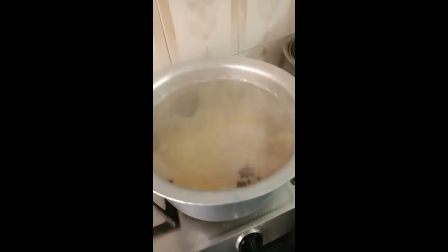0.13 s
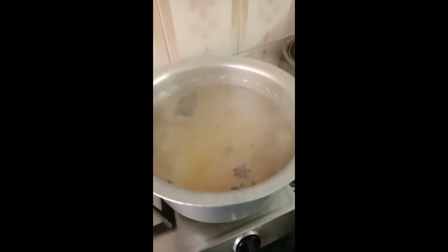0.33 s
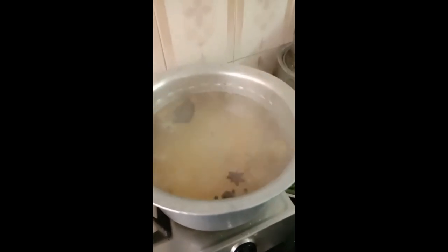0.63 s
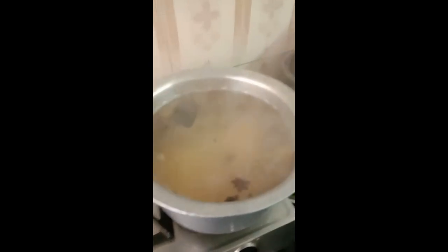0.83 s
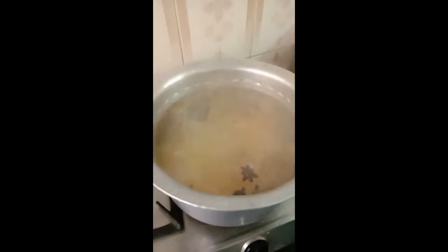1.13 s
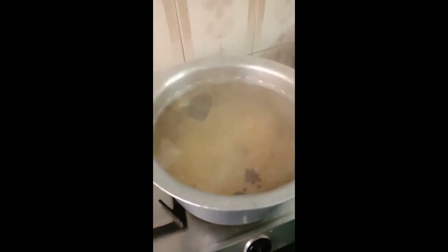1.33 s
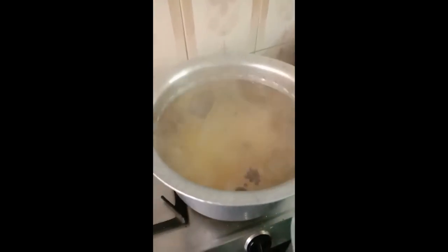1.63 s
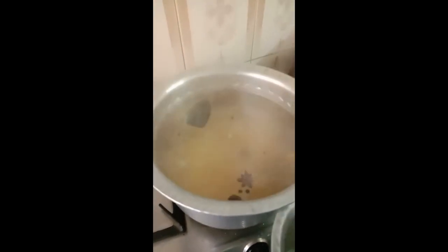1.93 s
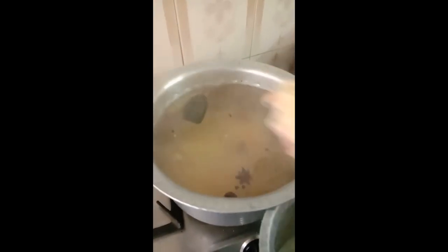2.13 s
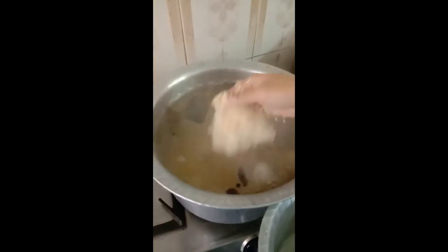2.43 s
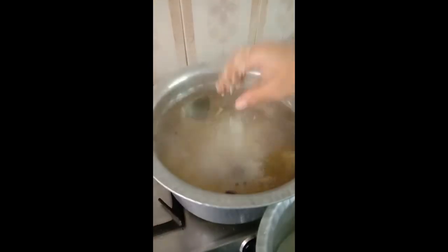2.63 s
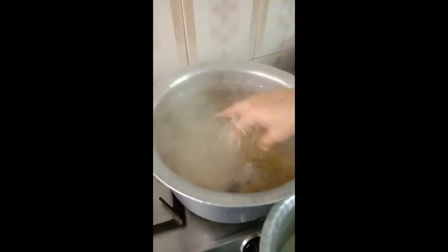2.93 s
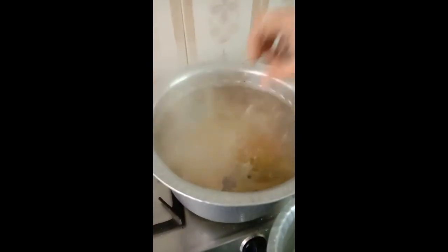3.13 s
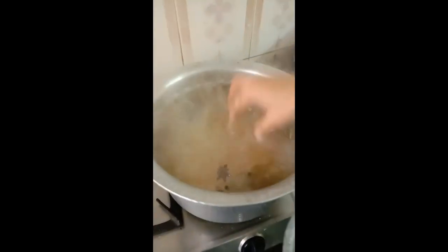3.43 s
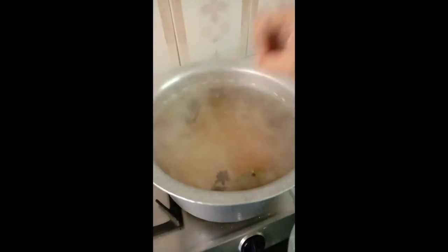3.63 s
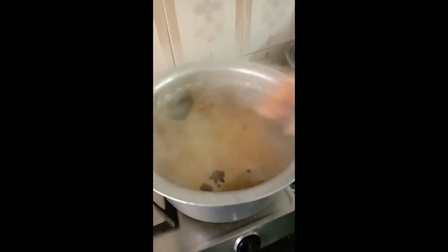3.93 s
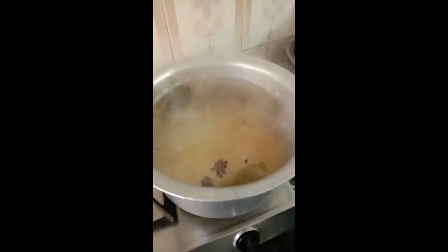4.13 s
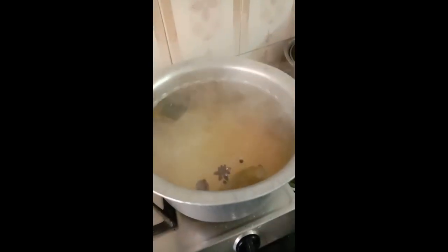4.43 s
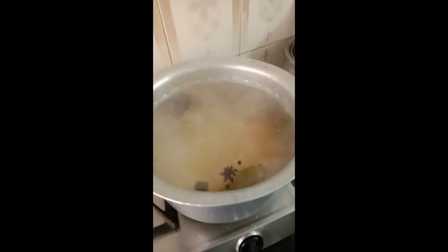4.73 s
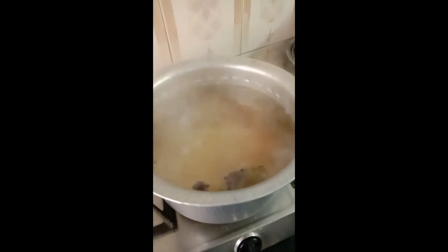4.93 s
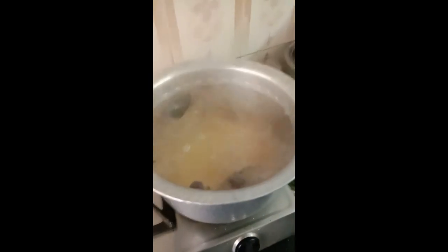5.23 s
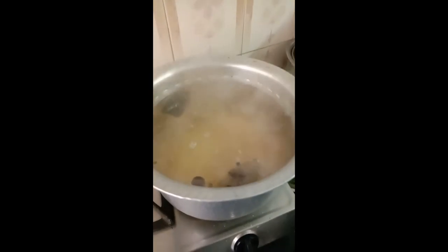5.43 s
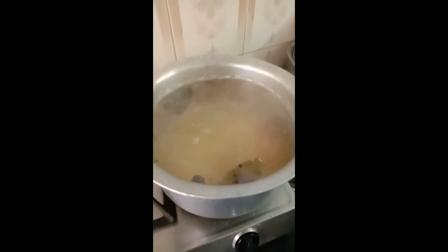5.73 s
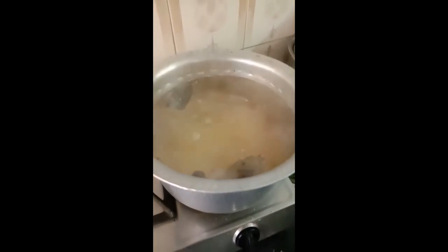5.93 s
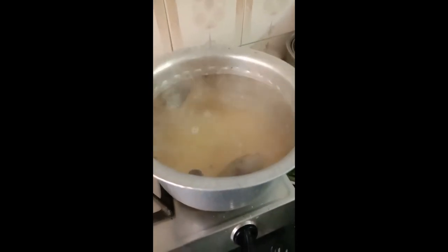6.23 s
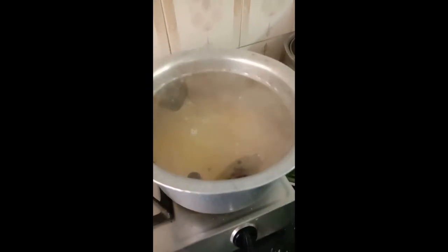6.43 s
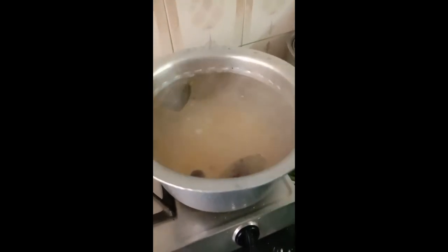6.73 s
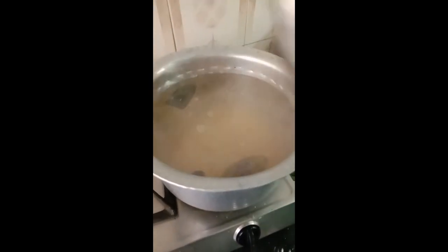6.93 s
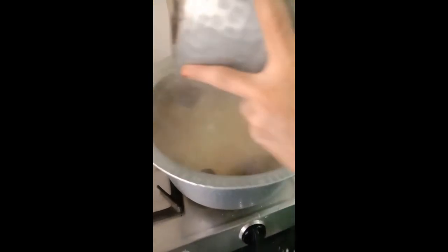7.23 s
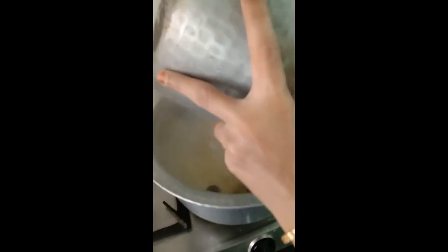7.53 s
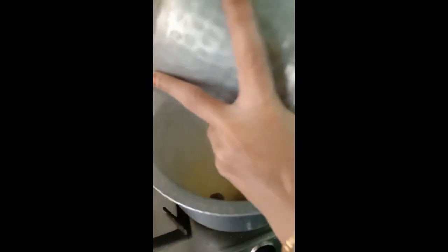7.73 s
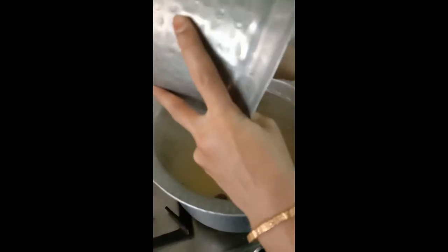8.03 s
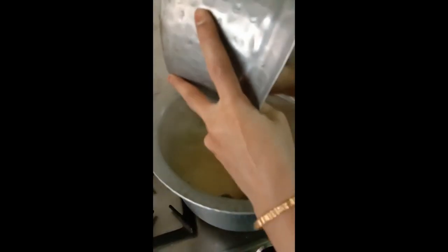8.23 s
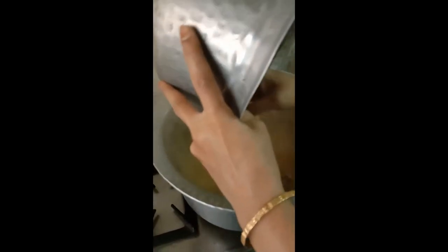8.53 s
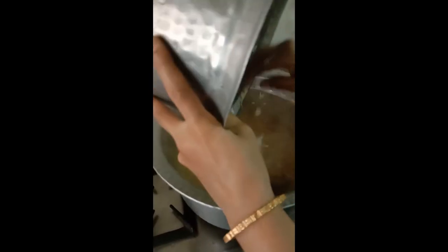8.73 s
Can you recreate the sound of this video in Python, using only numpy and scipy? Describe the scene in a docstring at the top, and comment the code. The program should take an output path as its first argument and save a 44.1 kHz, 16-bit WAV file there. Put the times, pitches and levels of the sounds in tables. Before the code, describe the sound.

A gas burner hisses steadily under a simmering pot while a cricket chirps outside. Wet rice drips and smacks into the water with bubbly plops, then metal knocks against the pot and rings. A metal vessel is set down with a few clanks and low booms, water wobbling inside it. Near the end more water and rice slop into the pot. It is heard close up in a small tiled kitchen with a short echo.

```python
"""First you hear a gas burner hissing under a simmering pot, with a cricket chirping outside.
Wet rice drips and smacks into the pot, trapping air bubbles that ring; metal knocks on metal.
The metal rice vessel is set down with a low boom, and the water swaying in it bends its notes.
Then more water and rice slop into the pot. The tiled walls of the small kitchen add a short echo."""
import sys
import numpy as np
from scipy import signal
from scipy.fft import rfft, irfft, next_fast_len
from scipy.io import wavfile
from scipy.ndimage import uniform_filter1d, map_coordinates

SR = 44100
rng = np.random.default_rng(int(sys.argv[2]) if len(sys.argv) > 2 else 0)


def output_pcm(signal):
    """Save a mono or channel-first signal as 16-bit PCM at the path in sys.argv[1].

    Samples are clipped to [-1, 1] before scaling.
    """
    pcm = np.clip(np.atleast_2d(signal).T, -1, 1) * 32767
    wavfile.write(sys.argv[1], SR, np.round(pcm).astype(np.int16))


N = 391166
TIME = np.arange(N) / SR
FFT_SIZE = next_fast_len(N, True)


def amp(db):
    """Turns decibels into a number to multiply by."""
    return 10 ** (np.asarray(db) / 20)


def unit(x):
    """Scales a signal to an average size (rms) of 1."""
    return x / np.sqrt(np.mean(x ** 2) + 1e-20)


def at_pitch(points, hz):
    """Looks up a value by frequency, on a scale of octaves."""
    f, value = np.transpose(points)
    return np.interp(np.log(hz + 1), np.log(f + 1), value)


def at_time(points, t=TIME):
    """Looks up a value by time."""
    return np.interp(t, *np.transpose(points))


def add(mix, s, sound):
    """Mixes a sound in at s seconds."""
    part = mix[max(round(s * SR), 0):][:len(sound)]
    part += sound[:len(part)]


def noise(colour, size):
    """Noise whose colour(hz) says how strong each frequency is, in dB."""
    hz = np.fft.rfftfreq(size, 1 / SR) + 1
    phases = np.exp(2j * np.pi * rng.random(len(hz)))
    return unit(irfft(amp(colour(hz)) * phases, size))


def hump(centre_hz, octaves):
    """A colour with one peak, 6 dB weaker this many octaves to either side."""
    return lambda hz: -6 * (np.log2(hz / centre_hz) / octaves) ** 2


def boost(resonances, hz):
    """How many dB a set of peaks and dips adds at each frequency."""
    return sum(db * np.exp(-2 * ((hz - f) / width) ** 2) for f, width, db in resonances)


def wander(per_s):
    """A random wobble that heads for a new value per_s times a second."""
    targets = rng.standard_normal(2000)
    return unit(np.interp(TIME * per_s, np.arange(len(targets)), targets))


def drifting(colour, drift, per_s):
    """Noise whose peaks all slide up and down in pitch together."""
    steady = noise(colour, next_fast_len(N + SR, True))
    position = np.cumsum(1 + drift * wander(per_s))
    return map_coordinates(steady, [position], order=3, mode="wrap")


def flicker(x, depth_db):
    """Makes narrow bands of a hiss briefly swell and sink."""
    bands = signal.stft(x, nperseg=1024, noverlap=768)[2]
    patches = uniform_filter1d(rng.standard_normal(bands.shape), size=4, axis=0)
    patches = unit(uniform_filter1d(patches, size=13, axis=1))
    return signal.istft(bands * amp(depth_db * patches), nperseg=1024, noverlap=768)[1][:N]


# Colours of the burner's roar and of its hiss: f/Hz, level/dB
ROAR_COLOUR = [(20, 2.5), (48, -12), (65, -28), (88, 0.5), (120, -16), (160, -6), (230, -14), (400, -16),
               (600, -22), (780, -13.5), (900, -20.5), (1020, -13.5), (1270, -4), (1550, -13.5),
               (2100, -23.5), (2600, -37), (3300, -61), (6000, -80)]
HISS_COLOUR = [(2700, -94), (3100, -12.5), (3500, -13.5), (4250, -10), (4850, -11), (5300, -9), (6300, -4),
               (7200, -7), (8000, -6.5), (9700, -6.5), (11500, -13), (13500, -18), (15000, -7),
               (16000, -6.5)]
# Peaks and dips from the burner, the pot and their corner: f/Hz, width/Hz, boost/dB
BURNER_RESONANCES = [(900, 12, 6), (1267, 64, 8), (1404, 18, 9), (1860, 120, 4), (2330, 210, -5),
                     (2710, 120, -5), (3020, 230, -9), (3990, 470, 3.5), (4234, 142, -20), (4796, 190, 7),
                     (5245, 146, -24), (7160, 690, 11), (7960, 230, -8.5), (8700, 130, 3),
                     (8790, 275, -13.5)]
# Loudness of the flowing gas and of the fluttering flame: t/s, level/dB
GAS_LEVEL = [(0.0, -41.5), (1.3, -44), (2.5, -42), (5.4, -43), (6.9, -45), (7.5, -43), (8.5, -45),
             (8.87, -43)]
FLAME_LEVEL = [(0.0, -45), (0.48, -55.5), (0.54, -42), (0.87, -52), (0.89, -41), (1.07, -48), (1.23, -42),
               (1.76, -56), (1.86, -42.5), (2.16, -42.5), (2.63, -60), (3.0, -55), (3.02, -43.5),
               (3.25, -58.5), (3.74, -42), (3.85, -55.5), (4.2, -45.5), (4.45, -60.5), (4.7, -69),
               (7.5, -66), (8.87, -59)]
def burner():
    """Gas hisses through the jet and roars in the tube; the flame flutters low under the pot."""
    def hiss_colour(hz):
        bass_cut_db = 40 * np.maximum(np.log2(2500 / hz), 0)
        return at_pitch(HISS_COLOUR, hz) + boost(BURNER_RESONANCES, hz) - bass_cut_db

    roar = noise(lambda hz: at_pitch(ROAR_COLOUR, hz) + boost(BURNER_RESONANCES, hz), FFT_SIZE)[:N]
    roar *= amp(-52 + 2.5 * wander(per_s=14))
    hiss = drifting(hiss_colour, drift=0.014, per_s=3.5)
    hiss *= amp(at_time(GAS_LEVEL) + 1.21 + wander(per_s=24))
    flame = noise(hump(centre_hz=95, octaves=0.35), FFT_SIZE)[:N]
    flame *= amp(at_time(FLAME_LEVEL) + 2.5 * wander(per_s=14))
    return flicker(roar, depth_db=2) + flicker(near_echoes(hiss), depth_db=1.47) + flame


# Hollow notes of the pot: f/Hz, half-width/octaves, level/dB
HOLLOW_NOTES = [(895, 0.066, -67), (1120, 0.063, -67.5), (1266, 0.045, -59.5)]
# They grow as the water comes back to the boil: t/s, boost/dB
SIMMER_GROWTH = [(0, -11.5), (4.5, 2.5), (6, 5), (8.87, 8)]
def simmer(surge_db=4.5):
    """Steam wells up unevenly and sounds the pot's hollow notes, which drift as it swirls."""
    out = np.zeros(N)
    for hz, octaves, db in HOLLOW_NOTES:
        note = drifting(hump(hz, octaves), drift=0.011, per_s=6)
        out += note * amp(db + at_time(SIMMER_GROWTH) + surge_db * wander(per_s=13))
    return out


def crackle(ticks_per_s=30, decay_s=0.00082):
    """Tiny bubbles burst on the surface with faint ticks."""
    out, t = np.zeros(N), np.arange(512) / SR
    for when, size in rng.random((1500, 2))[:int(ticks_per_s * N / SR)]:
        db = -45 - 3 * np.log(1 - 0.97 * size)
        tick = noise(hump(centre_hz=7500, octaves=0.78), len(t)) * np.exp(-t / decay_s)
        add(out, when * N / SR, amp(db) * tick)
    return out


def bubble(hz, cycles, rise):
    """Trapped air rings briefly and climbs in pitch as it nears the surface."""
    age = np.arange(int(4 * cycles * SR / hz) + 2) * hz / (cycles * SR)  # 1 after `cycles` swings
    loudness = np.exp(-age) * (1 - np.exp(-age * cycles * 2))
    return loudness * np.sin(2 * np.pi * cycles * (age + rise * age ** 2 / 2))


# Gushes of water and loose rice: start/s, peak/s, end/s, bubble level/dB, spray level/dB,
# big-bubble f/Hz, fade towards small bubbles/(dB per octave), spray f/Hz
GUSHES_OF_WATER = [(0.019, 0.1, 0.4, -39, -45.5, 1370, 6, 4530),
                   (0.29, 0.49, 0.91, -40.5, -69, 1010, 4.5, 5000),
                   (1.849, 1.895, 1.935, -46, -52, 1500, 11, 4500),
                   (2.455, 2.456, 2.68, -45.5, -43, 1530, 8, 5000),
                   (2.498, 2.625, 2.65, -45, -46, 1450, 6, 4250),
                   (4.24, 4.238, 4.34, -49, -46, 1550, -2, 3200),
                   (5.361, 5.42, 5.594, -49, -40.5, 1750, 1, 4530),
                   (5.44, 5.51, 5.58, -42, -48, 980, 8, 3000),
                   (5.81, 5.88, 5.95, -44.5, -51, 1920, 7, 3900),
                   (5.89, 5.935, 6.11, -44, -51, 1140, 7.5, 3570),
                   (6.403, 6.418, 6.51, -35, -59, 1830, 16.5, 3000),
                   (6.53, 6.58, 6.68, -48, -72, 790, 9, 3020),
                   (7.203, 7.312, 8, -40.5, -62, 1640, 19, 3000),
                   (7.348, 7.413, 7.62, -39, -45, 1100, 4.5, 2600),
                   (7.621, 7.77, 8.2, -62, -48, 850, 4, 4100),
                   (8.155, 8.173, 8.24, -48, -53, 2600, 8, 3480),
                   (8.2, 8.404, 8.62, -49, -67, 870, 3, 3800),
                   (8.595, 8.665, 8.78, -44.5, -49, 1420, 2.5, 3020)]
def bubbling(pitches=48, bubbles_per_s=9000, spread_db=4.8):
    """Boiling and falling water make a swarm of bubbles; the smaller ones are fainter."""
    out = np.zeros(N)
    strength, lowest_hz, fade_db = water_flow()
    per_pitch = int(bubbles_per_s * N / SR / pitches)
    for hz in np.geomspace(550, 12000, pitches):
        when, size, sign = rng.random((2500, 3))[:per_pitch].T
        starts = (when * (N - 1)).astype(int)
        octaves_up = np.log2(hz / lowest_hz[starts])
        db = spread_db * np.minimum(-np.log(1 - size), 4) - fade_db[starts] * np.maximum(octaves_up, 0)
        db += 60 * np.minimum(octaves_up, 0)  # bubbles too big for the stream barely sound
        ring = np.sqrt(hz) * bubble(hz, cycles=9.8, rise=0.021)
        rings = np.outer(amp(db) * np.sign(sign - 0.5), ring)
        samples = starts[:, None] + np.arange(len(ring))
        out += np.bincount(samples.ravel(), rings.ravel(), N)[:N]  # adds each ring in its place
    return unit(out) * amp(-4) * strength


def water_flow(boil_hz=1040, boil_fade_db=4.5, sink_octaves=0.14):
    """Blends an uneven boil with the gushes into the bubbles' strength, lowest note and treble fade."""
    power = amp(-58.5 + 3 * wander(per_s=4.5)) ** 2
    note, fade = power * boil_hz, power * boil_fade_db
    for start, peak, end, db, _, hz, fade_db, _ in GUSHES_OF_WATER:
        gush = (amp(db) * np.interp(TIME, [start, peak, end], [0, 1, 0])) ** 2
        progress = np.interp(TIME, [start, end], [-0.5, 0.5])
        power += gush
        note += gush * hz * 2 ** (-sink_octaves * progress)  # bubbles grow as the gush digs in
        fade += gush * fade_db
    return np.sqrt(power), note / power, fade / power


def spray(patter_db=2):
    """With each gush, countless tiny splashes merge into a soft swish."""
    out, patter = np.zeros(N), amp(patter_db * wander(per_s=300))
    for start, peak, end, _, db, _, _, hz in GUSHES_OF_WATER:
        swell = np.interp(start + np.arange(SR) / SR, [start, peak, end], [0, 1, 0])
        add(out, start, amp(db) * swell * noise(hump(hz, octaves=0.86), SR))
    return out * patter


# When each chirp starts: t/s
CHIRP_STARTS = [0.019, .62, 1.251, 1.868, 2.5, 3.178, 3.848, 4.198, 4.738, 5.366, 5.98, 6.697, 7.339, 7.965,
                8.662]
# The cricket grows louder halfway through: t/s, level/dB
CHIRP_LEVEL = [(0, -57), (3.9, -54), (4.7, -50), (6.8, -46.5), (8.87, -48)]
def cricket(wing_hz=4500, sag_hz=60, strokes_per_s=32, stroke_s=0.021, chirp_s=0.255, rise_s=0.011):
    """Each wing stroke is a short tone that sags in pitch; eight make a chirp."""
    out, progress = np.zeros(N), np.linspace(0, 1, int(stroke_s * SR))
    strokes = np.arange(0, chirp_s - stroke_s / 2, 1 / strokes_per_s)
    for start in CHIRP_STARTS:
        db = at_time(CHIRP_LEVEL, start)
        for s, (late, size, detune) in zip(strokes, rng.standard_normal((20, 3))):
            hz = wing_hz + 12 * detune + sag_hz * (0.5 - progress)
            stroke = np.sin(np.pi * progress) * np.sin(2 * np.pi * np.cumsum(hz) / SR)
            onset = 1 - np.exp(-(s + stroke_s) / rise_s)
            gain = 2 * onset * amp(db + 2 * size - s)  # fades 1 dB a second
            add(out, start + s + 0.0008 * late, gain * stroke)
    return out


# The loudest plops: t/s, level/dB, f/Hz, ring time/cycles
DROP_PLOPS = [(.082, -47, 1590, 36), (0.209, -32, 2940, 8), (0.288, -33, 1990, 15),
              (.364, -31.5, 1380, 5.1), (0.421, -45.5, 863, 15), (0.458, -33, 1287, 9.7),
              (0.508, -38, 1230, 13), (.586, -38, 1195, 14), (.679, -37.5, 786, 10),
              (0.682, -39.5, 1280, 7.8), (0.707, -39, 1230, 15), (.71, -46, 866, 11),
              (0.759, -45, 2950, 19), (.811, -37.5, 2930, 4.3), (0.95, -40, 3310, 8.8),
              (1.04, -43.5, 3200, 9), (1.081, -41, 792, 14), (1.082, -40.5, 1120, 29),
              (1.124, -39.5, 1272, 25), (1.137, -52, 755, 22), (1.196, -32, 2480, 4.7),
              (1.251, -37, 1151, 10), (1.328, -41.5, 3100, 3.8), (1.433, -26, 4510, 3.1),
              (2.642, -38, 1960, 5), (3.01, -49, 2330, 4), (3.391, -41.5, 2200, 2.2),
              (3.76, -54, 2500, 4.3), (4.245, -33.5, 2076, 3.5), (7.019, -39, 1246, 8.4),
              (7.301, -45.5, 460, 15), (7.301, -36, 1282, 10), (7.347, -35.5, 1750, 8),
              (7.374, -36.5, 834, 4.5), (7.406, -35.5, 846, 7.7), (7.465, -37, 880, 7.7),
              (7.493, -29.5, 3160, 3.8), (7.516, -34.5, 749, 4), (7.569, -32, 1766, 5.5),
              (7.668, -34, 748, 5.8), (7.679, -44, 785, 3.2), (7.725, -38.5, 2520, 8),
              (7.854, -40, 1270, 8.8), (8.659, -42.5, 800, 11)]
def plops(followers=8, spread_octaves=0.249, rise=0.012):
    """A drop or lump punches a hole in the water: one main bubble, then weaker, mostly smaller ones."""
    out = np.zeros(N)
    for s, db, hz, cycles in DROP_PLOPS:
        add(out, s, amp(db + 4) * bubble(hz, cycles, rise))
        cluster_s = 0.022 * np.sqrt(1000 / hz)  # higher plops are over sooner
        delays = np.sort(rng.random(followers))
        detunes = rng.exponential(1, followers) - 0.5
        for delay, detune in zip(delays, detunes):
            small_hz = min(hz * 2 ** (spread_octaves * detune), SR / 4)
            small = bubble(small_hz, cycles=4, rise=rise)
            add(out, s + delay * cluster_s, amp(db + 3 - 7 * delay) * small)
    return out


# The loudest smacks of rice: t/s, level/dB, f/Hz, decay/s, half-width/octaves
RICE_SLAPS = [(.193, -34, 3280, .013, 1.3), (.362, -27, 2850, 0.0058, 1.4), (.457, -25, 4700, 0.0085, 1.3),
              (1.964, -30.5, 4100, 0.0092, 1.1), (2.038, -34.5, 3840, 0.0088, 1.2),
              (2.222, -25.5, 6260, 0.012, .7), (2.236, -28.5, 5030, 0.0075, 1.3),
              (4.2399, -21, 6570, 0.0034, 1.1), (5.021, -30, 5500, 0.0054, 0.7),
              (5.304, -33, 4400, 0.0069, .8), (7.373, -32, 2880, 0.0091, 1.4),
              (7.398, -31, 2000, .007, 1.8), (7.417, -31, 2280, .007, 1.4), (7.437, -34, 1900, 0.0025, 1.2),
              (7.463, -27.5, 2100, 0.0069, 1.6), (7.526, -32, 3160, .0038, 1.9),
              (7.593, -29.5, 3600, .01, 1.3), (7.6098, -22, 5100, .00088, 1.2),
              (7.668, -31, 2200, 0.0037, 1.3), (7.68, -30, 4370, 0.0023, 0.69),
              (7.726, -33, 3880, 0.0038, 0.45), (8.2142, -25.5, 8400, 0.0017, 0.73),
              (8.829, -37, 6060, 0.012, 0.76)]
def slaps(rise_s=0.0031, grit=0.28):
    """Wet rice smacks the water and throws a short, gritty spray."""
    out, t = np.zeros(N), np.arange(8192) / SR
    for s, db, hz, decay_s, octaves in RICE_SLAPS:
        roughness = unit(uniform_filter1d(rng.standard_normal(len(t)), size=30))
        specks = unit(np.exp(grit * roughness))
        burst = np.exp(-t / decay_s) * (1 - np.exp(-t / min(rise_s, decay_s / 2)))
        add(out, s, amp(db + 3) * noise(hump(hz, octaves), len(t)) * specks * burst)
    return out


# Lone bubbles that ring on: t/s, length/s, start f/Hz, end f/Hz, level/dB
LONE_BUBBLES = [(.585, 0.15, 1130, 1280, -37), (5.3, .12, 976, 1240, -40.5)]
def glugs(fade_db=14, edge_s=0.0019):
    """A large bubble sings upwards and fades as it nears the surface."""
    out = np.zeros(N)
    for s, length, start_hz, end_hz, db in LONE_BUBBLES:
        progress = np.linspace(0, 1, int(length * SR))
        tone = np.sin(2 * np.pi * np.cumsum(start_hz + (end_hz - start_hz) * progress) / SR)
        soft_edges = np.minimum(np.minimum(progress, 1 - progress) * length / edge_s, 1)
        add(out, s, tone * amp(db - fade_db * progress) * soft_edges)
    return out


def knocks(blows, notes, colour, clank_s, rattle_s, rise_s):
    """Struck metal rings with clear notes, clanks and rattles; soft blows are duller."""
    out, t = np.zeros(N), np.arange(SR) / SR
    for s, ring_db, clank_db, hardness, place, rattle_db in blows:
        ring = np.zeros(SR)
        for k, (hz, rim_db, base_db, ring_s) in enumerate(notes):
            db = rim_db + place * (base_db - rim_db) - 60 * t / ring_s
            ring += (-1) ** k * amp(db) * np.sin(2 * np.pi * hz * t)
        clank = noise(
            lambda hz: at_pitch(colour, hz) + hardness * np.log2(np.clip(hz, 200, 3000) / 1000), SR)
        clank *= np.exp(-t / clank_s) + amp(rattle_db - 60 * t / rattle_s)
        onset = 1 - np.exp(-t / rise_s)
        add(out, s, (amp(ring_db) * ring + amp(clank_db) * clank) * onset)
    return out


# Blows on the pot: t/s, ring level/dB, clank level/dB, hardness/(dB per octave),
# place (rim 0, base 1), rattle next to the clank/dB
POT_BLOWS = [(1.9645, -43, -21, -8.5, 0.64, -17), (2.037, -50, -27, -10.5, 0.74, -22),
             (2.1075, -14.5, -15, 5, 0.45, -21.5), (2.119, -40, -21.5, 6, 0.3, -23)]
# Its clear notes: f/Hz, level hit at the rim/dB, level hit at the base/dB, time to fade 60 dB/s
POT_NOTES = [(173, -33, -14, 0.12), (277, -46, -16, 0.052), (432, -14, -2.5, 0.066), (567, -38, -18, 0.074),
             (755, -11, -15, 0.074), (1065, -29, -26, 0.56), (1180, -14, -19, 0.31), (1230, -15, -16, 0.45),
             (1266, 4.5, -2.5, 0.12), (1350, -10, -6, 0.15), (1700, -29, -22, 0.22), (2220, -24, -5, 0.044)]
# Its clank, a crowd of short-lived notes: f/Hz, level/dB
POT_COLOUR = [(40, -50), (85, -22), (130, -13.5), (280, -7), (430, -10.5), (980, -8.5), (1310, 8.5),
              (1900, -26), (2900, -41), (3800, -29), (9000, -58), (15000, -58)]
def pot_knocks():
    """Metal knocks against the pot and sets it ringing."""
    return knocks(POT_BLOWS, POT_NOTES, POT_COLOUR, clank_s=0.01, rattle_s=0.68, rise_s=0.00044)


# Blows, clear notes and clank of the rice vessel, with the same columns as for the pot
VESSEL_BLOWS = [(4.507, -30.5, -14, 2.5, 0.26, -15.5), (5.0215, -25, -23.5, 1, 1, -23),
                (5.029, -46, -24, -7.5, 0.52, -11), (5.047, -48, -19.5, 4.5, 0.8, -19.5),
                (5.099, -40, -32, -12, 0.94, -21), (5.192, -37.5, -30.5, 5, 0.83, -34),
                (5.305, -59, -26.5, -4, 0.97, -30), (6.68, -62, -49, -15, 0.95, -16),
                (7.615, -72, -43.5, -21, 0.71, -27), (7.79, -70, -49, -11, 1, -14)]
VESSEL_NOTES = [(138, -38, -3, 0.19), (173, -21, -5.5, 0.67), (278, -15, 5, 0.24), (441.7, -7, 7.5, 0.17),
                (523, -1, -10, 0.82), (823, -6, -26, 0.3), (965, -22, 0, 0.34), (1030, -14, -28, 0.31),
                (1302, 20, -21, 0.27), (1420, -29, -7.5, 0.27), (1720, 6, -26, 0.58), (1760, -4, -19, 0.26),
                (2060, -13, -21, 0.47), (2780, -5, -21.5, 0.28)]
VESSEL_COLOUR = [(40, -50), (80, -31), (140, -6), (300, 0.5), (520, 5), (750, -5.5), (1250, -3),
                 (1600, -14), (1900, -10), (2400, -26), (5500, -28.5), (7500, -42), (15000, -63)]
def vessel_knocks():
    """The rice vessel clanks as it is set down, lifted and tipped."""
    return knocks(VESSEL_BLOWS, VESSEL_NOTES, VESSEL_COLOUR,
                  clank_s=0.0097, rattle_s=0.98, rise_s=0.00075)


# Low booms under the vessel: t/s, length/s, level/dB
LOW_BOOMS = [(4.511, 0.155, -37.5), (5.027, 0.16, -40.5)]
def booms(hz=81.6):
    """A low boom sounds under each heavy knock, holds briefly, then cuts off."""
    out = np.zeros(N)
    for s, length, db in LOW_BOOMS:
        t = np.arange(int(length * SR)) / SR
        add(out, s, amp(db) * signal.windows.tukey(len(t), 0.3) * np.sin(2 * np.pi * hz * t))
    return out


def sway(start_s=4.705, tip_s=4.86, settle_s=5.14, glide_s=0.0186, high_hz=432, rest_hz=286):
    """Water rocking over the vessel's thin base makes two low notes glide down and shudder."""
    tipped = 0.5 + 0.5 * np.tanh((TIME - tip_s) / (2 * glide_s))
    phase = 2 * np.pi * np.cumsum(high_hz + (rest_hz - high_hz) * tipped) / SR

    def note(ratio):
        shudder = 1 + 0.86 * (wander(per_s=70) + 1j * wander(per_s=70))  # shakes level and phase
        return (np.exp(1j * ratio * phase) * shudder).real

    swell_db = 25.5 * (np.minimum(TIME, settle_s) - start_s)
    fade_db = 80 * np.maximum(TIME - settle_s, 0)
    onset = np.clip((TIME - start_s) / 0.075, 0, 1)
    return onset * amp(-48.5 + swell_db - fade_db) * (note(1) + amp(-6) * note(1.54) * tipped)


# First echoes from the pot wall and the tiles: delay/s
ECHO_DELAYS = [.0014, .0021, .0029, .0043]
def near_echoes(x, gain=0.19, drift=0.028):
    """Nearby surfaces add a hollow colour that shifts as the listening point moves."""
    out = x.copy()
    for k, delay_s in enumerate(ECHO_DELAYS):
        moving_delay = delay_s * (1 + drift * wander(per_s=1.2))
        out += (-1) ** k * gain * np.interp(TIME - moving_delay, TIME, x)
    return out


# Peaks and dips from the air above the water: f/Hz, width/Hz, boost/dB
POT_RESONANCES = [(903, 21, 4), (1246, 68, 2.5), (1750, 140, 2.5), (2160, 51, -2.5), (2400, 150, 1.5),
                  (2965, 160, -4), (3400, 140, 3.5), (3960, 130, 4), (4120, 116, -0.5), (4660, 270, 3.5),
                  (5240, 75, 1), (7050, 540, 7), (8060, 260, -10)]
def in_pot(x):
    """The air in the pot strengthens some pitches and weakens others."""
    gain = amp(boost(POT_RESONANCES, np.fft.rfftfreq(FFT_SIZE, 1 / SR)))
    return irfft(rfft(x, FFT_SIZE) * gain, FFT_SIZE)[:N]


# How long the kitchen rings: f/Hz, time to fade 60 dB/s
KITCHEN_DECAY = [(100, 0.56), (500, 0.7), (1300, 0.63), (4000, 0.45), (15000, 0.32)]
def kitchen(x, echo_db, gap_s=0.001):
    """Close tiled walls return a wash of echoes whose highest pitches die first."""
    hz, t, bands = signal.stft(rng.standard_normal(SR // 2), SR, nperseg=256)
    fade = amp(-60 * t / at_pitch(KITCHEN_DECAY, hz)[:, None])
    tail = signal.istft(bands * fade, SR, nperseg=256)[1]
    tail *= np.clip(np.arange(len(tail)) / (SR * gap_s) - 1, 0, 1)
    return x + amp(echo_db) * signal.fftconvolve(x, tail / np.linalg.norm(tail))[:N]


def scene():
    """All the sounds round the stove, heard from one point."""
    metal = kitchen(pot_knocks() + vessel_knocks() + sway(), echo_db=-8) + booms()
    splashes = near_echoes(flicker(bubbling() + spray(), depth_db=2.5) + slaps())
    water = kitchen(in_pot(splashes + plops() + glugs()), echo_db=-6.5)
    mono = burner() + simmer() + metal + water + kitchen(cricket(), echo_db=-1.5) + crackle()
    return np.array([mono, mono])


def record(dry):
    """Trims the deepest rumble and the highest hiss."""
    low_cut = signal.butter(3, 52, "highpass", fs=SR, output="sos")
    high_cut = signal.firwin(511, 15650, window=("kaiser", 9), fs=SR)
    return signal.oaconvolve(signal.sosfilt(low_cut, dry), high_cut[None], "same")


dry = scene()
out = record(dry)
output_pcm(out)
```